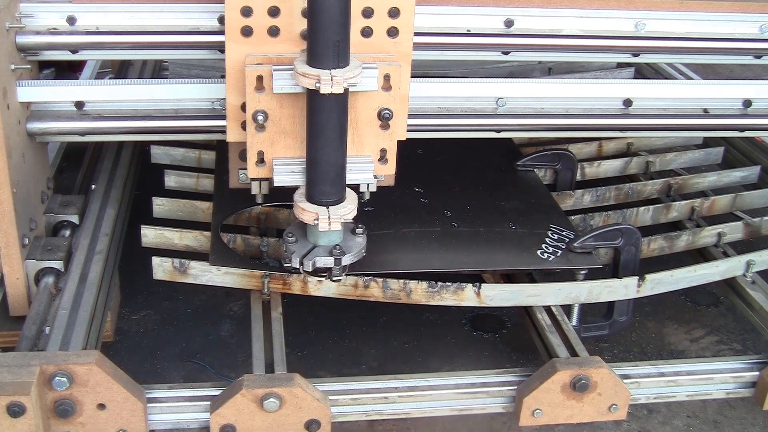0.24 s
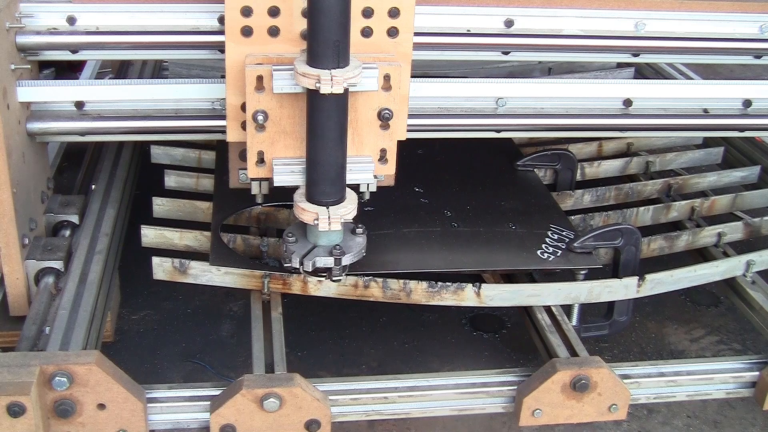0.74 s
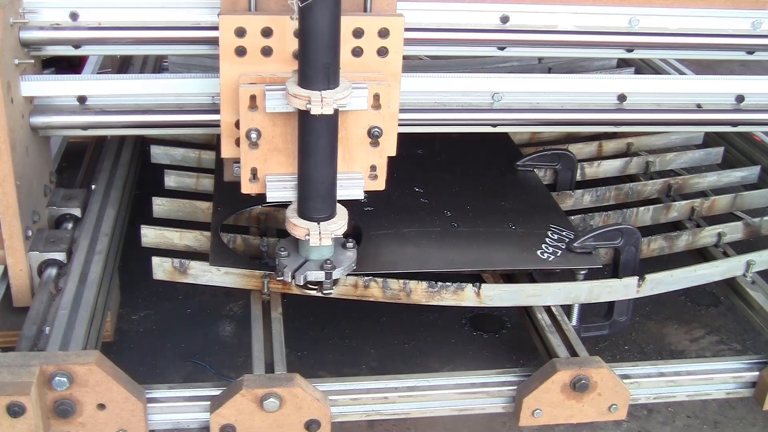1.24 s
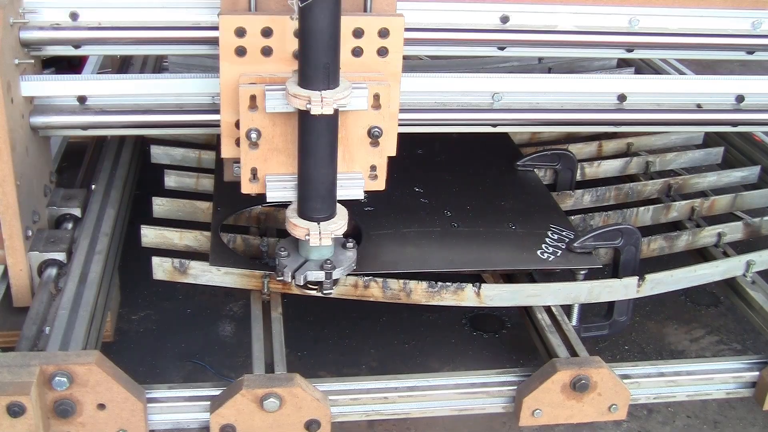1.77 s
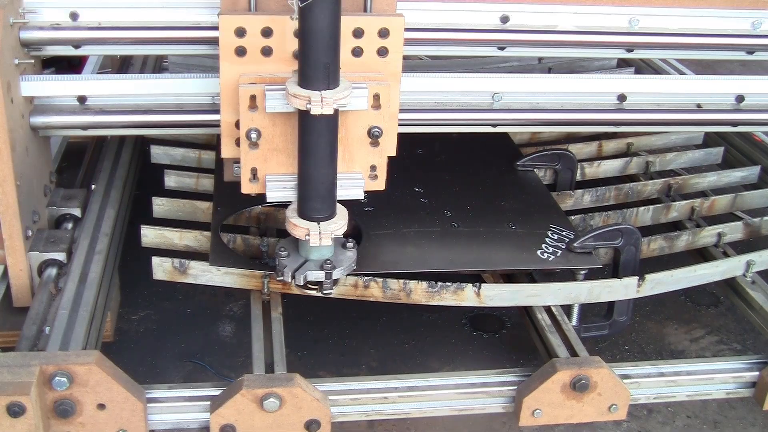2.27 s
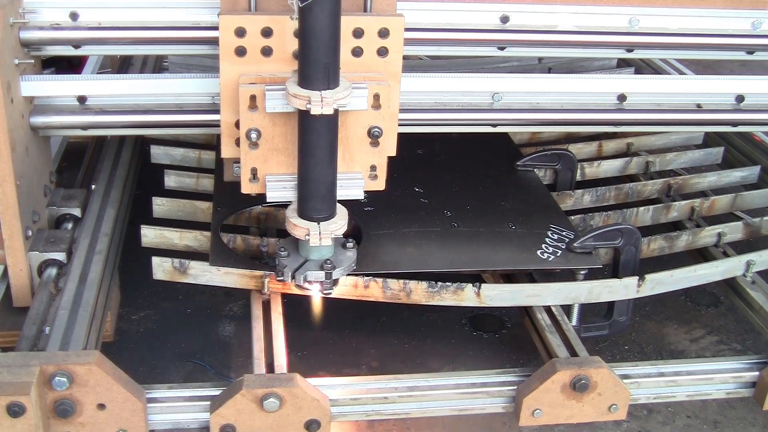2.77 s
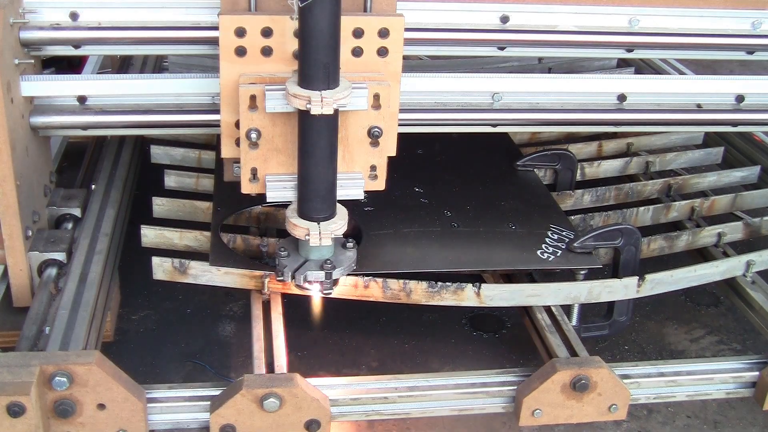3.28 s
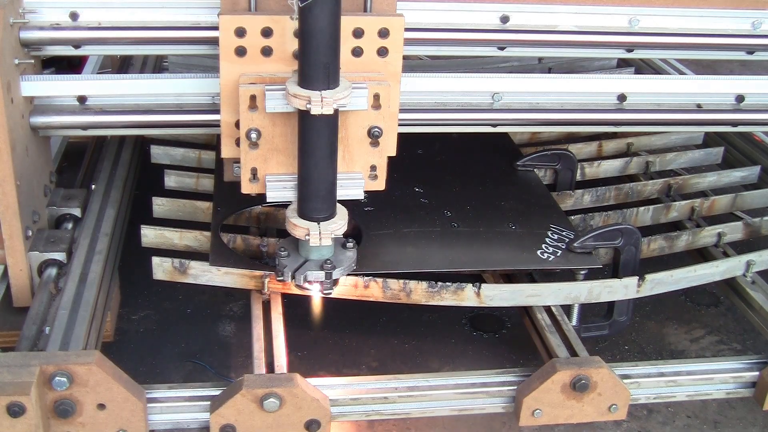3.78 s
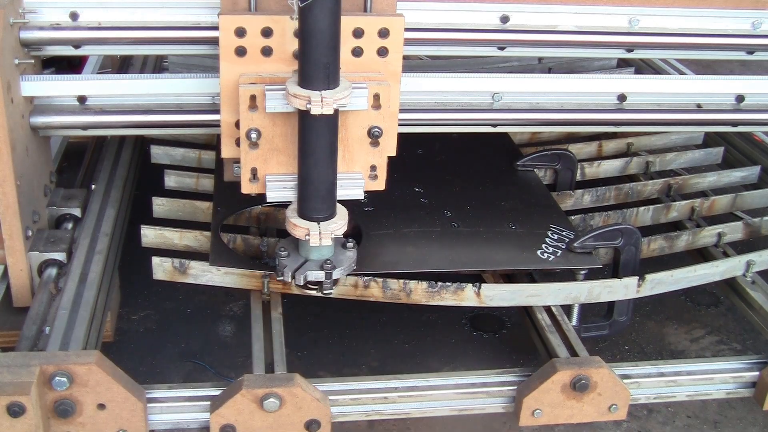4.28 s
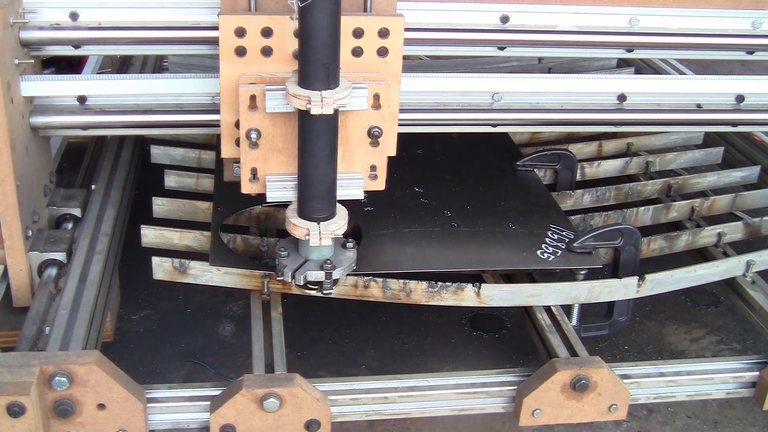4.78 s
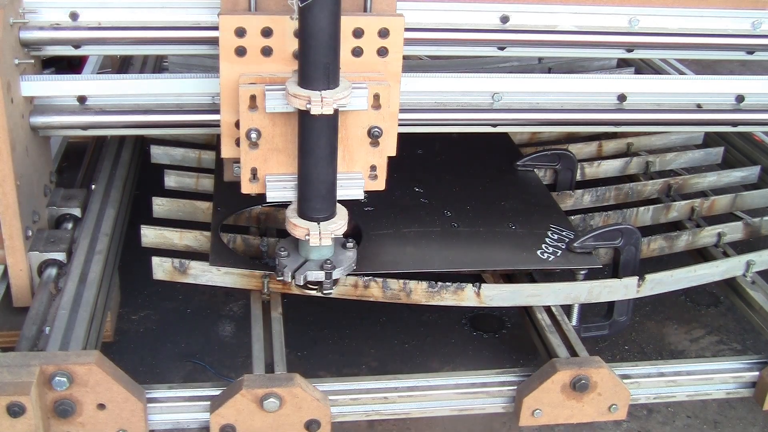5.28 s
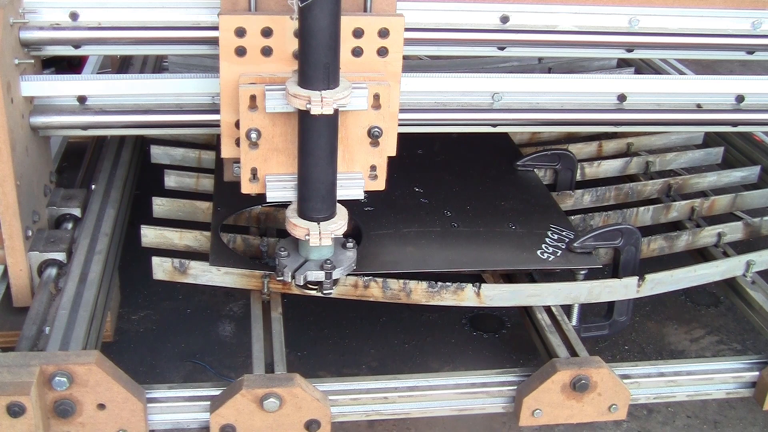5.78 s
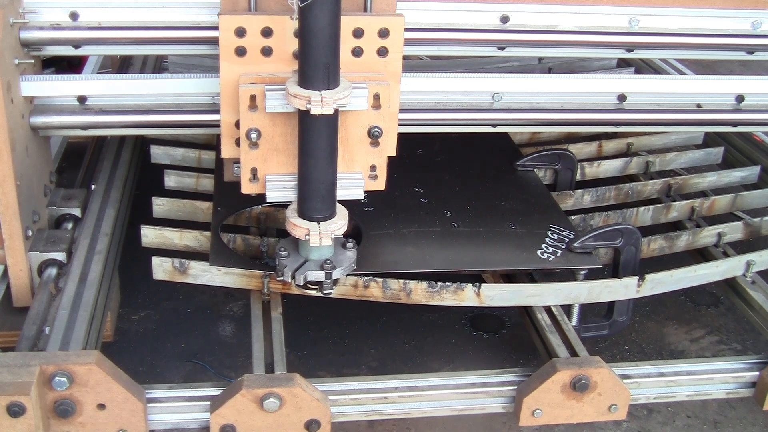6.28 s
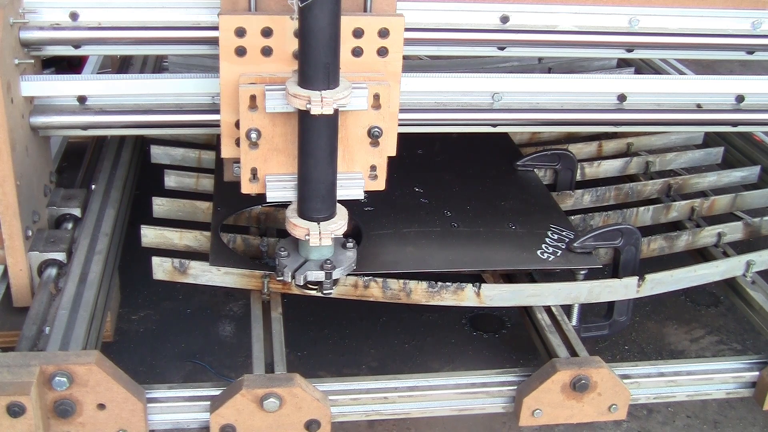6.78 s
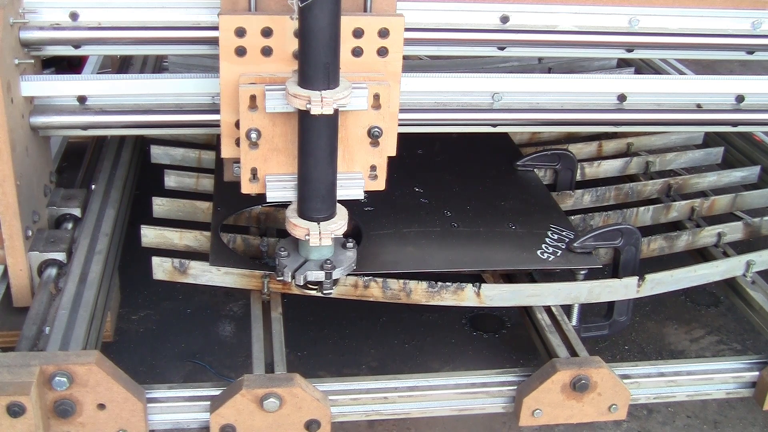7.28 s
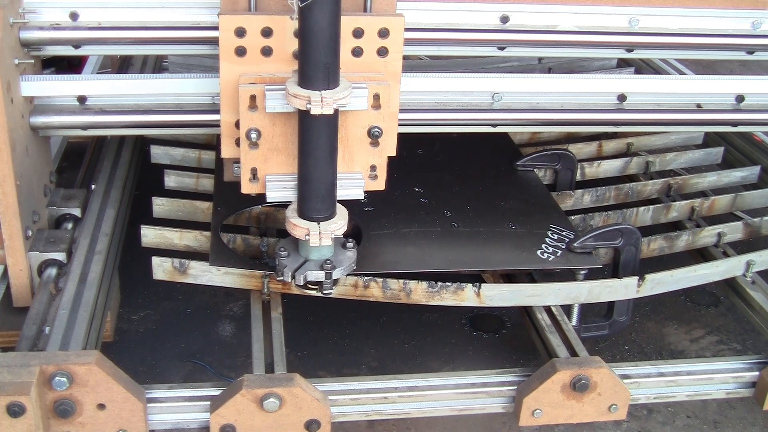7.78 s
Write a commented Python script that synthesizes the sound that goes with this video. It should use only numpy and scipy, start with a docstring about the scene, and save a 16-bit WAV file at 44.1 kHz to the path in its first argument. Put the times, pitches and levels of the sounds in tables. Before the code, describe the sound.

Bright air hiss stops, valve spits, buzzing gas surges to a crack and fierce arc roar, then long steady hiss until the arc strikes again.

```python
"""Plasma torch on a cutting table

Air hisses from the nozzle and stops, then gas builds up with a rising buzz until the arc strikes through sheet steel.
The arc snaps off, cooling air flows on, and the arc strikes again. Motors whine and waver over the shop's hum.
Flows are noise shaped by resonances, buzz and motors are wavering sines, valve and arc spit short noise bursts,
and cracks and thuds are fast-dying sines. An automatic gain control turns the level down in loud moments."""
import sys
import numpy as np
from scipy import signal
from scipy.fft import rfft, irfft, next_fast_len
from scipy.io import wavfile
from scipy.ndimage import minimum_filter1d, map_coordinates

SR = 44100
rng = np.random.default_rng(int(sys.argv[2]) if len(sys.argv) > 2 else 0)


def generate_wav(signal):
    """Clip the signal to [-1, 1] and save it as 16-bit WAV at the path in sys.argv[1]."""
    frames = np.transpose(np.atleast_2d(signal))
    scaled = np.clip(frames, -1, 1) * 32767
    pcm = np.round(scaled).astype(np.int16)
    wavfile.write(sys.argv[1], SR, pcm)


N = 354563

# What the torch does when, in seconds.
AIR_OFF_S, VALVE_S, STRIKE_S, ARC_OFF_S, RESTRIKE_S = .8162, 2.2305, 2.736, 4.169, 7.935
SWITCH_S = .003  # a flow starts or stops within this


def amp(db):
    """Turn decibels into a plain multiplier."""
    return 10 ** (np.asarray(db) / 20)


def unit(x):
    """Scale to an rms of 1."""
    return x / np.sqrt(np.mean(x ** 2) + 1e-20)


def along(points, hz):
    """Read a curve of (Hz, value) points on a log frequency axis."""
    f, v = np.transpose(points)
    return np.interp(np.log(hz + 1), np.log(f + 1), v)


def wobble(rate):
    """A smooth random curve with this many knots a second."""
    knots = rng.standard_normal(int(N * rate / SR) + 4)
    return map_coordinates(knots, [np.arange(N) * rate / SR])


def sine(hz):
    """A sine of rms 1 that follows a changing frequency."""
    return np.sqrt(2) * np.sin(2 * np.pi * np.cumsum(hz) / SR)


def filtered(x, response):
    """Multiply the spectrum of x by a response of frequency."""
    m = next_fast_len(N + SR // 2)
    hz = np.fft.rfftfreq(m, 1 / SR)
    return irfft(rfft(x, m) * response(hz), m)[..., :N]


def between(a, b, edge=SWITCH_S):
    """1 from a to b seconds and 0 outside, with short ramps."""
    corners = [a - edge / 2, a + edge / 2, b - edge / 2, b + edge / 2]
    return np.interp(np.arange(N) / SR, corners, [0, 1, 1, 0])


def flow(rows, echo_db=-120, t60=.1):
    """Steady while a flow is on; afterwards a weaker echo dies away, 60 dB in t60 seconds."""
    t = np.arange(N) / SR
    level = np.zeros(N)
    for start, stop, db in rows:
        echo = (t >= stop) * amp(echo_db - 60 * np.abs(t - stop) / t60)
        level += amp(db) * (between(start, stop) + echo)
    return level


def resonant(peaks, hz):
    """Power response of steep-sided resonances."""
    return sum(amp(2 * db) / (1 + ((hz - c) / w) ** 2) ** 2 for c, w, db in peaks)


# Spacing of the two microphone ports. Each row: frequency in Hz, lead of left over right in radians.
PORT_LEAD = [(80, 0.015), (200, 0.34), (550, 0.26), (1100, 0), (11000, 0), (11800, -1.2), (12600, -1.2),
             (13200, 0)]


def panned(x, pan):
    """Left and right, tilted in level and shifted in phase against each other by frequency."""
    half = np.array([[.5], [-.5]])
    return filtered(x, lambda hz: amp(half * along(pan, hz)) * np.exp(1j * half * along(PORT_LEAD, hz)))


def rush(gain, apart, pan):
    """Stereo noise of rms 1 with a colour, a width and a balance by frequency."""
    noise = rng.standard_normal((2, N))
    mid, side = filtered(noise, lambda hz: gain(hz) * amp([0 * hz, along(apart, hz)]))
    return unit(panned(np.array([mid + side, mid - side]), pan))


# Stereo balance of the jets. Each row: frequency in Hz, left minus right in dB.
JET_BALANCE = [(300, 2), (1300, 2), (2200, 1.3), (5500, -0.05), (9000, 1.3), (10600, 0.5), (11300, -2),
               (12800, 1), (13800, -0.5)]


def jet(level, air, peaks, apart, air_db, flicker_db, rough_db):
    """Broad turbulence (shifted by air_db) plus resonances; the flow flickers slowly and sputters fast."""
    def gain(hz):
        turbulence = amp(2 * (along(air, hz) + air_db))
        return np.sqrt(resonant(peaks, hz) + turbulence)
    unsteady = amp(flicker_db * wobble(12) + rough_db * wobble(350))
    return level * unsteady * rush(gain, apart, JET_BALANCE)


# When the first air flows. Each row: start in seconds, stop in seconds, level in dB.
PURGE_TIMES = [(-1, AIR_OFF_S, -35.5)]
# What nozzle, sheet and slats reinforce. Each row: frequency in Hz, width in Hz, relative level in dB.
PURGE_RESONANCES = [(2320, 110, -20.5), (2940, 250, -12.5), (4030, 430, -10.5), (4800, 110, -7.5),
                    (6080, 300, -10), (7150, 160, -9), (8130, 160, -1), (8940, 220, -3), (12100, 95, -22),
                    (14800, 62, -30)]
# Broad turbulence under those peaks, before its shift. Each row: frequency in Hz, relative level in dB per Hz.
PURGE_TURBULENCE = [(820, -53), (1400, -21.5), (1710, -19), (1910, -14.0), (2980, -13.5), (3230, -12.5),
                    (3930, -3.0), (4750, -7.5), (5460, -10.5), (6530, -11), (8890, 1), (13800, -21.5),
                    (15000, -31), (15250, -80)]
# Stereo width of the air. Each row: frequency in Hz, side minus mid in dB.
AIR_WIDTH = [(1200, -16), (1900, -41), (3000, -53), (4200, -20.5), (6000, -34), (6700, -11.5),
             (7500, -21.5), (10300, -16), (11000, -10), (11700, -2), (12800, -1.5), (14500, -12),
             (15200, -4)]


def purge_air():
    """Air hisses steadily from the nozzle; a faint echo lingers in the shop when it stops."""
    level = flow(PURGE_TIMES, echo_db=-38, t60=.17)
    return jet(level, PURGE_TURBULENCE, PURGE_RESONANCES, AIR_WIDTH, -1, 0.29, .8)


# Stereo balance of shop and motors. Each row: frequency in Hz, left minus right in dB.
SHOP_BALANCE = [(60, 1.5), (150, -1), (500, 3), (1300, 4), (1600, 1), (3500, 2.5), (5000, 1), (6500, 1),
                (11500, 1), (13000, -2)]


def motor_whine():
    """A motor holding the carriage sings about 11 Hz higher from .82 to 2.38 s, and softer under the first arc."""
    higher = between(AIR_OFF_S, 2.38)
    arc = between(STRIKE_S, ARC_OFF_S + 0.063, edge=.14)
    hz = 1238.7 + 11 * higher + 1.5 * wobble(30)
    db = -53.5 - 0.5 * higher - 6 * arc + 0.33 * wobble(20)
    return panned(amp(db) * sine(hz), SHOP_BALANCE)


# Steadier and fuzzier machine tones. Each row: start in seconds, stop in seconds, frequency in Hz,
# level in dB, width in Hz (a wider tone wavers further and faster in pitch and level).
MACHINE_TONES = [(-1, 9, 545.5, -64.5, 3.1), (-1, AIR_OFF_S, 119.3, -57, 2),
                 (-1, AIR_OFF_S, 334, -73.5, 5.2), (-1, AIR_OFF_S, 1087, -67.5, 7.6),
                 (AIR_OFF_S, STRIKE_S, 77.3, -72.5, 10), (AIR_OFF_S, STRIKE_S, 145, -73.5, 9.6),
                 (AIR_OFF_S, STRIKE_S, 182.5, -68, 9.2), (AIR_OFF_S, STRIKE_S, 1091, -71.5, 8),
                 (AIR_OFF_S, STRIKE_S, 1800, -72, 6.15), (ARC_OFF_S, 9, 79.8, -73.5, 6.7),
                 (ARC_OFF_S, 9, 237.5, -75, 6), (ARC_OFF_S, 9, 1081, -67, 4), (7, 7.6, 80, -64, 4)]


def machine_tones():
    """Sines that waver at random in pitch and level, each while its machine tone lasts."""
    tones = np.zeros(N)
    for start, stop, hz, db, width in MACHINE_TONES:
        level = amp(db + 0.37 * width * wobble(width + 1))
        tones += level * between(start, stop) * sine(hz + .5 * width * wobble(width + 1))
    return panned(tones, SHOP_BALANCE)


# Colour of the shop's hum. Each row: frequency in Hz, relative level in dB per Hz.
SHOP_COLOUR = [(15, -59), (25, -28), (60, -15.5), (150, -8), (488, -13.5), (543, -10.5), (604, -9.5),
               (1150, -8.5), (1240, -9.5), (1350, -13.5), (1670, -14.5), (2240, -19), (3010, -18.5),
               (9520, -37.5), (15000, -55)]
# Stereo width of the hum. Each row: frequency in Hz, side minus mid in dB.
SHOP_WIDTH = [(60, -26), (150, -20), (500, -8), (1300, -18), (4000, -21), (5500, -8), (10000, -10),
              (11500, 0), (13000, 0), (14500, -7)]


def shop_hum():
    """Broad noise, strongest at low and middle pitches, that drifts slowly in level."""
    level = amp(-56.5 + 0.48 * wobble(3.1))
    return level * rush(lambda hz: amp(along(SHOP_COLOUR, hz)), SHOP_WIDTH, SHOP_BALANCE)


# Gas valve and arc spit. Each row: start in seconds, level in dB before the trims below,
# time of the quick part to fall 60 dB in seconds.
SPIT_TIMES = [(2.2305, -42, .02), (2.2435, -25, .018), (2.2943, -19.5, .009), (7.9345, -16, .02)]
# Colour of the spits. Each row: frequency in Hz, width in Hz, relative level in dB.
SPIT_RESONANCES = [(2040, 110, -7), (3660, 1000, -10), (8600, 1200, -8), (10300, 650, 0), (13500, 900, -20)]
# Stereo width of spits, gas and arc. Each row: frequency in Hz, side minus mid in dB.
ARC_WIDTH = [(300, -4), (700, -13.5), (1500, -14.5), (3600, -49), (5700, -22), (6600, -20), (8000, -18.5),
             (10300, -19), (11000, -7), (11600, 3), (12400, -3), (13000, 0), (13600, -4), (15200, 2)]


def spits():
    """Short bursts of bright hiss: a quick rise, a fast fall and a weaker, slower tail."""
    burst, t = np.zeros(N + SR), np.arange(SR // 10) / SR
    rise = 1 - np.exp(-t / 0.00093)
    for start, db, t60 in SPIT_TIMES:
        quick = amp(db - 6.5 - 60 * t / t60)
        tail = amp(db - 19 - 60 * t / 0.17)
        burst[round(start * SR):][:len(t)] += (quick + tail) * rise
    return burst[:N] * rush(lambda hz: np.sqrt(resonant(SPIT_RESONANCES, hz)), ARC_WIDTH, JET_BALANCE)


# The valve opens in steps. Each row: end in seconds, dB held back until then (rows add up).
VALVE_STEPS = [(2.2435, 10), (2.2943, 6)]
# What reinforces the gas. Each row: frequency in Hz, width in Hz, relative level in dB.
BUILD_RESONANCES = [(1540, 83, -10), (2800, 130, -14), (3800, 51, -1.5), (4360, 44, -2), (4680, 71, -2),
                    (5410, 140, -20), (5940, 100, -17), (6300, 89, -7), (6560, 28, -2), (7000, 51, -6.5),
                    (7150, 36, -14), (8760, 250, -0.5), (9470, 29, -4), (9810, 37, -6), (10100, 56, -3),
                    (10640, 91, -3), (11200, 40, -18), (12100, 83, -16), (12500, 270, -14.5),
                    (13500, 73, -12.5)]
# Broad turbulence of the gas, before its shift. Each row: frequency in Hz, relative level in dB per Hz.
BUILD_TURBULENCE = [(410, -27), (700, -19.0), (1280, -11.0), (2460, -12.5), (2760, -9.0), (3180, -10.0),
                    (4500, -7.5), (7240, -10.0), (8670, 2.0), (10500, -6.5), (15000, -27), (15250, -80.5)]
# Sheet and slats pass some overtones of the flutter and swallow others. Each row: frequency in Hz, gain in dB.
SHEET_GAIN = [(320, -16), (370, -20), (420, -6), (460, -14), (500, -8), (620, 0), (750, -18), (900, -4),
              (1000, -1), (1110, 2), (1270, -5), (1500, 3), (1750, 3), (1880, -6), (2080, 0), (2450, -9),
              (2800, -4), (3300, -25)]


def gas_build_up():
    """Gas swells up to the strike while its jet flutters ever faster and louder: a buzz that also chops the hiss."""
    t = np.arange(N) / SR
    left = np.clip(STRIKE_S - t, 0, STRIKE_S - VALVE_S)  # seconds left until the strike
    buzz_from_s, buzz_fade_s = 2.42, .05
    on = between(buzz_from_s, STRIKE_S) * np.clip((t - buzz_from_s) / buzz_fade_s, 0, 1)
    hz = 508 - 715 * left  # rises 715 Hz a second
    uneven = 1 + .014 * wobble(120) + .012 * wobble(18)
    turn = 2 * np.pi * np.cumsum(hz * uneven) / SR
    overtones = np.zeros(N)
    for k in range(1, 9):
        broken_db = 2.8 * wobble(70) + 3.2 * wobble(22)
        overtone = np.sin(k * turn + 0.71 * wobble(40))
        overtones += amp(along(SHEET_GAIN, k * hz) + broken_db) * overtone
    buzz = on * amp(-33.5 - 80 * left) * overtones  # grows 80 dB a second
    choked_db = sum(db * (t < end) for end, db in VALVE_STEPS)
    level = between(VALVE_S, STRIKE_S) * amp(-21.5 - 48.5 * left - choked_db)  # grows 48.5 dB a second
    hiss = jet(level, BUILD_TURBULENCE, BUILD_RESONANCES, ARC_WIDTH, -1.7, 1.0, 0.69)
    return hiss * (1 + 0.3 * on * np.sin(turn)) + panned(buzz, JET_BALANCE)


# When the arc burns. Each row: start in seconds, stop in seconds, level in dB.
ARC_TIMES = [(STRIKE_S, ARC_OFF_S, -20.5), (RESTRIKE_S, 9, -21.5)]
# What reinforces the arc. Each row: frequency in Hz, width in Hz, relative level in dB.
ARC_RESONANCES = [(607, 43, -20.5), (1640, 380, -13.5), (2116, 46, -11.5), (2780, 78, -11),
                  (3786, 120, -6.5), (4680, 225, -9.5), (5500, 150, -13.5), (5800, 20, -5), (6180, 34, -3),
                  (6410, 170, -7.5), (6760, 110, -20.5), (7470, 79, -7), (7810, 67, -3), (7960, 38, -6),
                  (8800, 86, -2), (9200, 110, -5.5), (10050, 84, 0), (10520, 280, 1), (11300, 110, -30),
                  (11900, 160, -27), (12500, 180, -14), (13200, 230, -24), (13900, 120, -21)]
# Broad turbulence of the arc, before its shift. Each row: frequency in Hz, relative level in dB per Hz.
ARC_TURBULENCE = [(120, -70), (200, -29.5), (400, -25), (545, -28), (597, -28), (756, -19.5), (1540, -13.5),
                  (3070, -13), (4590, -5.5), (5210, -13), (6250, -9.5), (9340, -5), (10400, -7),
                  (15600, -29)]


def arc_roar():
    """The burning arc roars as a strong jet; its echo dies away in the shop when it stops."""
    level = flow(ARC_TIMES, echo_db=-11.5, t60=0.25)
    return jet(level, ARC_TURBULENCE, ARC_RESONANCES, ARC_WIDTH, -3.0, 0.29, 0.86)


# Arc on or off. Each row: start in seconds, crack level in dB, thud level in dB (both before the bass cut).
ARC_POPS = [(2.7363, -12, -17), (4.1694, -23, -23.5), (7.9359, -16, -22)]


def arc_pops():
    """A sharp crack on a slower pressure swing when the arc starts or dies."""
    push, t = np.zeros(N + SR), np.arange(SR // 10) / SR

    def ring(hz, t60):
        return amp(-60 * t / t60) * np.sin(2 * np.pi * hz * t)
    crack = ring(1300, .0045) - .35 * ring(4500, .015)
    thud = ring(560, .009) + .45 * ring(230, .025)
    for start, crack_db, thud_db in ARC_POPS:
        push[round(start * SR):][:len(t)] -= amp(crack_db) * crack + amp(thud_db) * thud
    # low cut of the microphone: the pops have no deep bass
    push = filtered(push[:N], lambda hz: (1j * hz / (110 + 1j * hz)) ** 2)
    return panned(push, JET_BALANCE)


# When cooling air flows. Each row: start in seconds, stop in seconds, level in dB.
COOLING_TIMES = [(ARC_OFF_S, RESTRIKE_S, -36.5)]
# What reinforces the cooling air. Each row: frequency in Hz, width in Hz, relative level in dB.
COOLING_RESONANCES = [(3810, 69, -7), (4370, 66, -5), (4870, 370, -7), (6700, 40, -15), (8130, 70, -2),
                      (9100, 540, -2.5), (9730, 93, -7)]
# Broad turbulence of the cooling air, before its shift. Each row: frequency in Hz, relative level in dB per Hz.
COOLING_TURBULENCE = [(820, -26), (1400, -17.0), (2670, -11), (3100, -12.0), (3460, -4.5), (4800, -7),
                      (5680, -8.5), (7070, -8.0), (8130, -2.0), (8980, 0.5), (10700, -6.5), (11500, -13),
                      (13400, -16.5), (15000, -27.5), (15250, -80)]


def cooling_air():
    """Air flows on between the two arcs as a steady hiss."""
    return jet(flow(COOLING_TIMES), COOLING_TURBULENCE, COOLING_RESONANCES, AIR_WIDTH, -0.5, 0.32, 0.33)


def frame_echoes(x):
    """Faint scattered echoes off slats and rails comb the hiss finely."""
    t = np.arange(1, SR // 25) / SR
    scatter = unit(rng.standard_normal(len(t)) * amp(-60 * t / .08))
    echoes = amp(-13) * scatter / np.sqrt(len(t))
    return signal.fftconvolve(x, np.r_[1, echoes][None], axes=1)[:, :N]


def scene():
    """The jets with their echoes, the spits and pops, the motors and the shop."""
    jets = frame_echoes(purge_air() + gas_build_up() + arc_roar() + cooling_air())
    machines = motor_whine() + machine_tones() + shop_hum()
    return jets + spits() + arc_pops() + machines


def record(dry):
    """Gain drops within some milliseconds above a knee, holds, then climbs steadily; then low cut and band limit."""
    knee_db, firmness = -32.5, .64  # firmness: share of the excess dB taken off
    look_s, hold_s, back_db_per_s = .015, .045, 80
    top_hz, low_cut_hz = 15700, 40
    look = round(look_s * SR)
    power = signal.lfilter([1 / look], [1, 1 / look - 1], np.mean(dry ** 2, axis=0))  # smoothed
    want_db = -firmness * np.maximum(0, 10 * np.log10(power + 1e-12) - knee_db)
    span = 2 * round(hold_s * SR / 2) + 1
    held_db = minimum_filter1d(want_db, size=span, origin=span // 2)
    ramp = back_db_per_s * np.arange(N) / SR
    gain_db = ramp + np.minimum.accumulate(held_db - ramp)  # never climbs faster than the ramp
    return filtered(dry * amp(gain_db), lambda hz: (hz < top_hz) * 1j * hz / (low_cut_hz + 1j * hz))


dry = scene()
out = record(dry)
generate_wav(out)
```